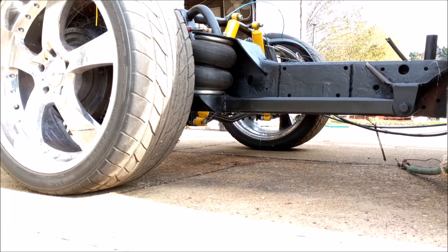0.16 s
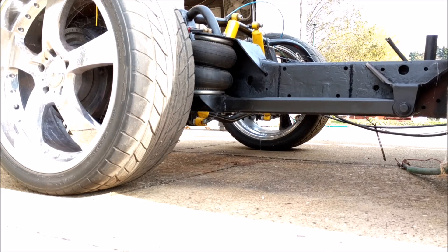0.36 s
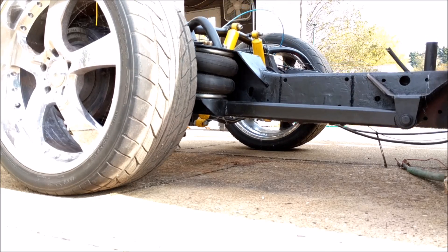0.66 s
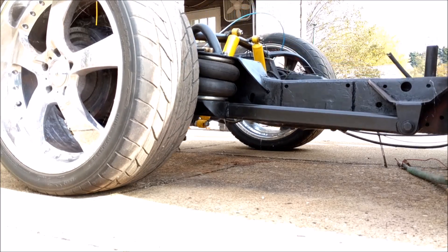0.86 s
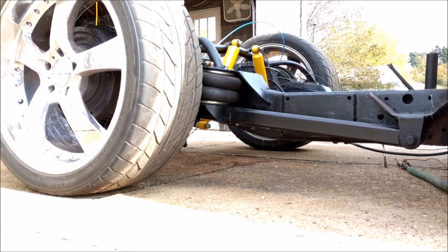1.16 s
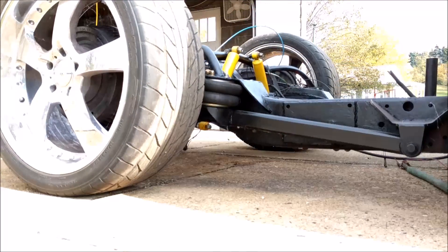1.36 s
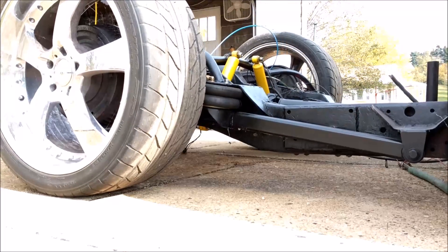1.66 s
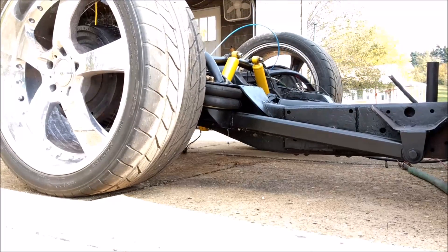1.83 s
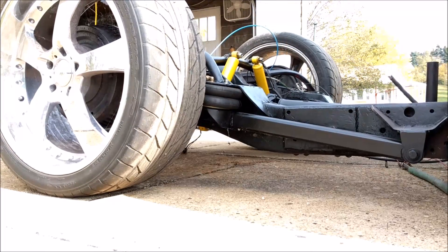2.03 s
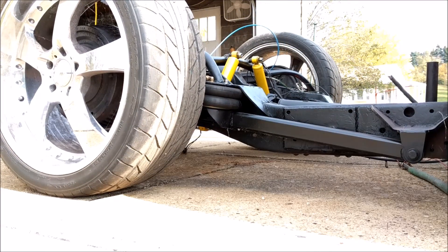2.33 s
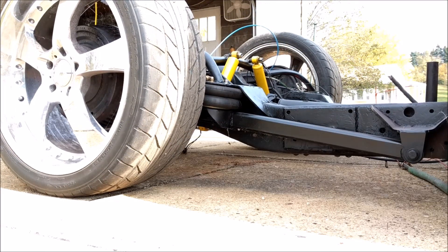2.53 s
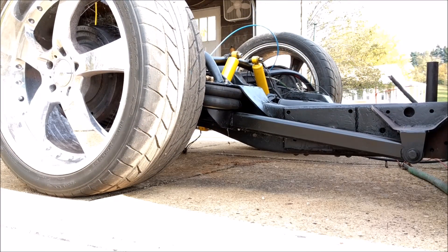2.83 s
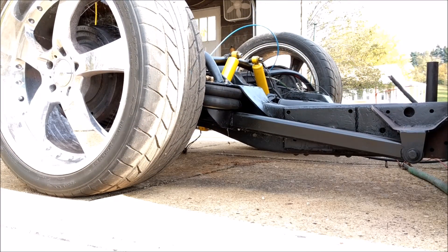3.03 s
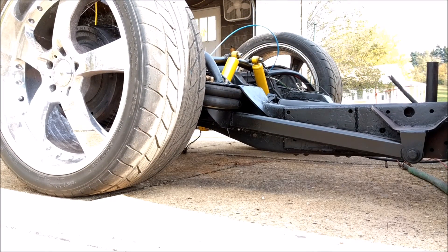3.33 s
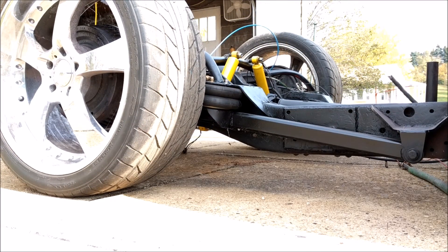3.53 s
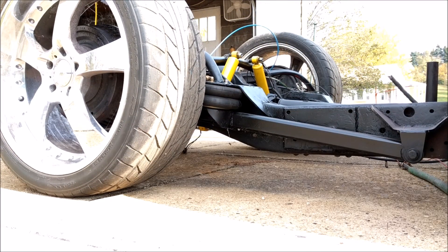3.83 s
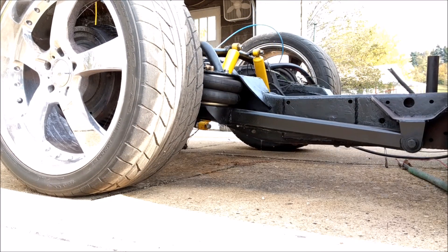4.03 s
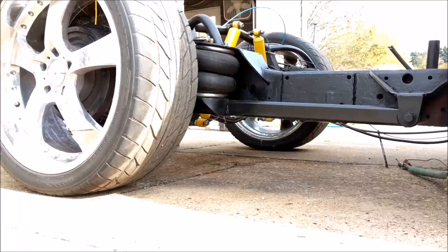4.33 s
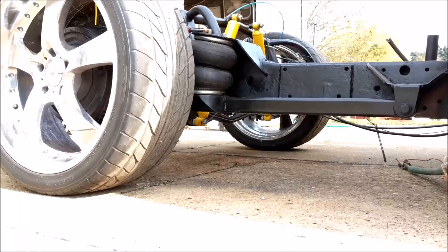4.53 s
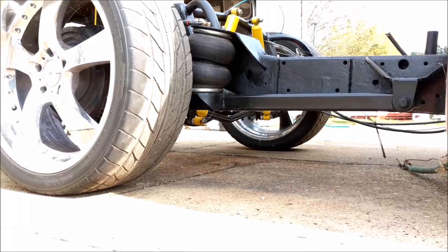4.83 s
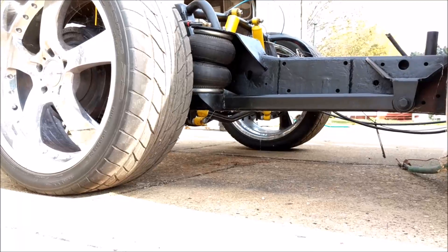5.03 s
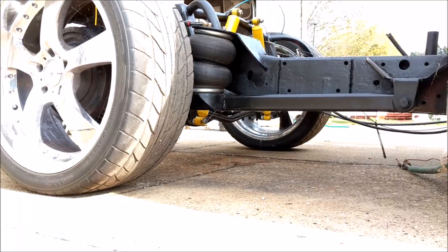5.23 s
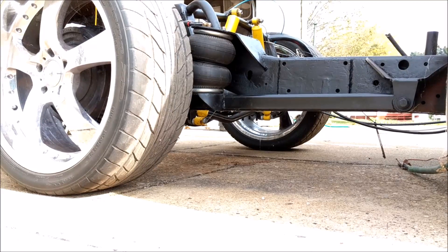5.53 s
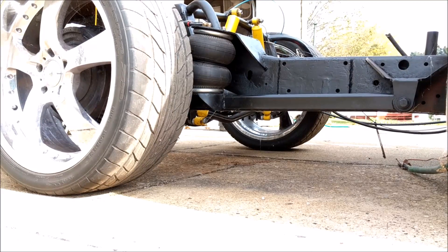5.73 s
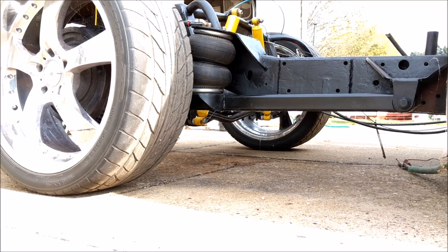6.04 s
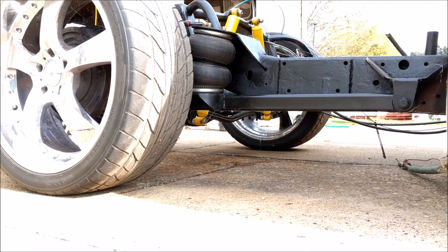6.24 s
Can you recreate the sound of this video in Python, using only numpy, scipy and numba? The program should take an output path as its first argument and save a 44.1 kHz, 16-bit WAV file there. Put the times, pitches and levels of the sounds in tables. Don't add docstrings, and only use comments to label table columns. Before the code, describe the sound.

On a concrete drive, a truck's air bags empty with an abrupt, harsh rush of air whose colour shifts as the frame sinks and bumps onto its stops. Steel rattles and hums briefly, and faint road drone returns. Then a very short violent blast, followed by a thinner whistling hiss that weakens before stopping. A few tiny ticks follow. Slightly coarse mono camera sound with short nearby reflections.

```python
import sys
import numpy as np
from scipy import signal
from scipy.fft import rfft, irfft, next_fast_len
from scipy.io import wavfile
from scipy.ndimage import uniform_filter1d
from numba import njit

SR = 44100
rng = np.random.default_rng(int(sys.argv[2]) if len(sys.argv) > 2 else 0)


def level_to_linear(level):
    exponent = np.asarray(level, float) / 20
    return 10 ** exponent


def transcribe(u):
    v = np.clip(np.atleast_2d(u).T, -1, 1)
    q = np.round(v * 32767).astype(np.int16)
    wavfile.write(sys.argv[1], SR, q)


N = 281799
TIME = np.arange(N) / SR


def unit(x):
    return x / np.sqrt(np.mean(x ** 2))


def walk(rate, size):
    hold = int(SR / rate)
    targets = rng.standard_normal(N // hold + 1)
    return unit(uniform_filter1d(np.repeat(targets, hold)[:size], hold))


@njit
def resonance(x, hz, width):
    y, band, low = np.empty(len(x)), 0., 0.
    for i in range(len(x)):
        g, k = np.tan(np.pi * hz[i] / SR), width / hz[i]
        v = (band + g * (x[i] - low)) / (1 + g * (g + k))
        band, low, y[i] = 2 * v - band, low + 2 * g * v, k * v
    return y


def air(spectrum, edges_hz, band_db, flicker_db, rate, size):
    fast = next_fast_len(size)
    octave = np.log2(np.arange(1, fast // 2 + 2) * SR / fast)
    hz, db = np.transpose(spectrum)
    noise = rfft(rng.standard_normal(fast)) * level_to_linear(np.interp(octave, np.log2(hz), db))
    centres = np.arange(np.floor(np.log2(hz[0])), np.log2(SR / 2) + .5, .5)
    zones = np.searchsorted(np.log2(edges_hz), centres)
    flicker = np.broadcast_to(flicker_db, 3)
    total = [np.zeros(size) for _ in range(3)]
    for centre, zone in zip(centres, zones):
        part = irfft(noise * np.clip(1 - 2 * abs(octave - centre), 0, 1), fast)[:size]
        total[zone] += part * level_to_linear(flicker[zone] * walk(rate, size))
    return sum(level_to_linear(db) * unit(x) for db, x in zip(band_db, total))


def valve(t, stroke, tail_db_s, lead_db):
    opens, shuts, closing, lost_db, linger = stroke
    lift_s, lead_db_s = .0013, 5000
    db = np.interp(t, [opens - lift_s, opens, shuts, shuts + closing], [lead_db, 0, 0, lost_db])
    lead_in = lead_db_s * np.minimum(t - opens + lift_s, 0)
    return db + lead_in + tail_db_s * np.maximum(t - shuts - closing - linger, 0)


def peak(t, s, db, rise_db_s, fall_db_s, round_s):
    return db - np.where(t < s, rise_db_s, fall_db_s) * (np.hypot(t - s, round_s) - round_s)


def place(x, t):
    start = round(t[0] * SR)
    return np.pad(x, (start, N - start - len(x)))


def late(x, ms):
    return np.roll(x, int(ms * SR / 1000))


# (pitch [Hz], level [dB per Hz])
TALL_BAG_AIR = [(150, -51), (250, -21.5), (298, -32), (336, -23.5), (538, -16.5), (1310, -17.5),
                (1610, -12), (4050, -0.5), (4900, -7), (6000, -5), (7310, -11.5), (9170, -6.5),
                (11300, -15), (14700, -5), (16000, -19)]
# (pitch [Hz], level [dB per Hz])
FLAT_BAG_AIR = [(150, -56.5), (250, -25.5), (436, -15), (723, -16), (1180, -10), (1310, -15), (1700, -6.5),
                (2160, -9.5), (2360, -2), (3650, -3), (4410, -3.5), (5630, -6), (7570, -12), (12500, -10),
                (15300, -6), (16000, -11)]
# (early pitch [Hz], late pitch [Hz], width [Hz], level [dB], time [s], length [s])
HOLLOWS = [(6250, 5500, 330, -7, 0.52, 0.28), (5650, 5600, 240, -10.5, 1.35, .55),
           (3900, 3900, 450, -8, .65, .25), (3690, 3450, 350, -7, 1.4, 0.23),
           (2470, 2350, 200, -7, .98, .28), (4230, 4200, 300, -9, 1.1, .2),
           (9200, 9300, 1000, -12, 1.2, .9), (3200, 3200, 350, -4, .41, .04),
           (8900, 8900, 900, -6, .4, .04), (13000, 13100, 700, -13, 1.2, .4),
           (1750, 1850, 250, -15, 1.0, .4)]
# (level [dB], change [dB/s], first surge [dB], tail [dB/s])
JET_ZONES = [(-24.5, 0.3, 5, -100), (-17.5, -.2, 9.5, -125), (-16, -5.5, 11, -200)]


def dump():
    t = TIME[SR // 4:2 * SR]
    stroke = (.394, 1.668, .018, -14, .04)
    surge_s, sinks_s, sinking_s = .026, .5, .9
    age = np.maximum(t - stroke[0], 0)
    sag = np.clip((t - sinks_s) / sinking_s, 0, 1)
    levels = []
    for db, change_db_s, surge_db, tail_db_s in JET_ZONES:
        surge = surge_db * np.exp(-age / surge_s)
        levels.append(db + change_db_s * age + surge + valve(t, stroke, tail_db_s, lead_db=-9))
    levels[1] = levels[1] + 3 * np.exp(-((t - .65) / .19) ** 2)
    jet = np.sqrt(1 - sag) * air(TALL_BAG_AIR, (2200, 6900), levels, 1.2, 14, len(t))
    jet += np.sqrt(sag) * air(FLAT_BAG_AIR, (2200, 6900), levels, 1.2, 14, len(t))
    for tall_hz, low_hz, width_hz, mode_db, s, length in HOLLOWS:
        hz = (tall_hz + (low_hz - tall_hz) * sag) * (1 + .018 * walk(6, len(t)))
        swell = np.exp(-((t - s) / length) ** 2)
        swell = swell * level_to_linear(levels[1] + mode_db + 1.5 + 1.5 * walk(8, len(t)))
        jet += swell * unit(resonance(rng.standard_normal(len(t)), hz, 1. * width_hz))
    return place(jet, t)


# (pitch [Hz], level [dB per Hz])
BLAST_AIR = [(88, -47.5), (150, -12), (235, -13), (391, -6), (1080, -20), (1630, -19), (2650, -11.5),
             (2870, -1.5), (3620, -8), (4000, -9), (4670, -9), (14500, -7.5), (16000, -12)]
# (pitch [Hz], level [dB per Hz])
HOSE_AIR = [(240, -45), (400, -21.5), (1090, -16.5), (1420, -12), (2180, -11.5), (2670, -10.5), (3120, -4),
            (3870, -8.5), (4440, -7), (11500, -16), (16000, -27)]
# (level [dB], change [dB/s], tail [dB/s])
HISS_ZONES = [(-40, -9, -110), (-23.5, -15, -300), (-26.5, -17, -360)]
# (pitch [Hz], width [Hz], level [dB], row of SONG_PEAKS that drives it)
HOSE_NOTES = [(1440, 110, 0, 0), (1900, 150, -2.5, 0), (2234, 120, 0, 1), (3222, 180, 0.5, 2),
              (4420, 250, 0, 3), (5510, 280, 0, 3), (6300, 250, -3, 3), (7500, 300, -7.5, 3),
              (9370, 560, -5.5, 3)]
# (time [s], level [dB], rise [dB/s], fall [dB/s], tail [dB/s])
SONG_PEAKS = [(4.14, -39.5, 80, 7, -80), (4.45, -23.5, 70, 50, -130), (4.29, -23.5, 85, 45, -350),
              (4.14, -32, 60, 22, -300)]


def fill():
    t = TIME[15 * SR // 4:21 * SR // 4]
    lead_db = -30
    blast = (3.9562, 3.984, .012, -11.5, .001)
    opens, *closing = (4.03, 4.835, .02, -4, .001)
    flow = (blast[1], *closing)
    blast_db = -1.5 - 90 * np.clip(t - blast[0], 0, blast[1] - blast[0])
    blast_db = blast_db + valve(t, blast, -400, lead_db)
    out = level_to_linear(blast_db) * air(BLAST_AIR, (900, 6900), (-21, -3, -4), 1.5, 90, len(t))

    age = np.maximum(t - blast[1], 0)
    swell_db = 20 * np.log10(np.clip(age / (opens - blast[1]), 1e-3, 1))
    levels = [db + change_db_s * age + swell_db + valve(t, flow, tail_db_s, lead_db)
              for db, change_db_s, tail_db_s in HISS_ZONES]
    out += air(HOSE_AIR, (1900, 6900), levels, 1.5, 12, len(t))

    flat_start, tighten_s, droop_per_s = .17, .1, .085
    bend_hz = 2300
    ratio = 1 + .012 - flat_start * np.exp(-(age / tighten_s / 2) ** 2)
    droop = 1 - droop_per_s * age ** 3
    for hz, width_hz, note_db, row in HOSE_NOTES:
        *top, tail_db_s = SONG_PEAKS[int(row)]
        bend = ratio ** (bend_hz / hz) * droop ** min(hz / bend_hz, 1)
        pitch = hz * bend * (1 + .012 * walk(15, len(t)))
        tone = resonance(rng.standard_normal(len(t)), pitch, 2.2 * width_hz)
        tone = resonance(tone, pitch, 1.2 * width_hz)
        db = note_db + peak(t, *top, round_s=.08) + valve(t, flow, tail_db_s, lead_db)
        out += unit(tone) * level_to_linear(db + 2.0 * walk(12, len(t)))
    return place(out, t)


# (time [s], level [dB], pitch [Hz], length [ms])
PUFFS = [
    (3.9595, -6, 425, 2.8),
    (3.972, -18, 55, 9),
    (1.632, -15, 420, 7),
    (4.035, -32, 340, 6),
    (4.062, -31, 450, 5),
    (4.088, -31, 330, 7),
    (4.095, -29, 75, 18),
    (4.87, -33, 190, 14),
]


def puffs():
    out = np.zeros(N)
    for s, db, hz, ms in PUFFS:
        swell = np.exp(-((TIME - s) * 1000 / ms) ** 2)
        out += level_to_linear(db) * swell * np.sin(2 * np.pi * hz * (TIME - s))
    return out


# (delay [ms], level [dB])
ECHOES = [(2.9, -22), (5.3, -19), (8.7, -17), (13.1, -17), (19.7, -17), (27.3, -18), (38.9, -19.5)]


def echoes(jets):
    return sum(level_to_linear(db) * late(jets, ms) for ms, db in ECHOES)


# (time [s], level [dB], own note [Hz], note over the rails [dB], note dies 60 dB in [s])
KNOCKS = [(0.393, -10.5, 262, 15.5, 0.046), (1.617, -8.5, 828, 13, 0.056), (1.624, -4, 748, 12.5, 0.082),
          (1.633, -18, 412, 19, 0.055), (1.641, -8.5, 280, 10, 0.056), (1.652, -3.5, 195, 12.5, 0.063),
          (1.666, -9, 319, 15, 0.069), (1.681, -10, 252, 16, 0.05), (1.705, -14, 182, 15, 0.045),
          (1.732, -21.5, 174, 12, 0.05), (1.78, -17, 199, 12, 0.043), (1.84, -16.5, 75, 13.5, 0.064)]
# (pitch [Hz], level [dB], dies 60 dB in [s])
RAILS = [(129, -8, 0.44), (199, -6, 0.38), (264, -5, 0.57), (335, -9, 0.8), (375.5, -5.5, 0.37),
         (528, -20, 0.96), (748, -22.5, 1.8), (877, -4.5, 0.11), (1087, -8.5, 0.23), (1416, -15.5, 0.38)]


def frame():
    out, t = np.zeros(N), TIME[:SR // 2]
    for s, db, note_hz, note_db, note_t60 in KNOCKS:
        modes = [(hz, mode_db + 3 * rng.standard_normal(), .8 * t60) for hz, mode_db, t60 in RAILS]
        modes.append((note_hz, note_db, max(note_t60, .01)))
        ring = np.zeros(len(t))
        for hz, mode_db, t60 in modes:
            ring += level_to_linear(mode_db) * np.exp(-np.log(1000) * t / t60) * np.sin(2 * np.pi * hz * t)
        push = np.hanning(int(.6 * SR / note_hz) + 3)
        knock = np.convolve(ring, push / push.sum())[:len(t)]
        start = int(s * SR)
        out[start:start + len(t)] += level_to_linear(db - 17.5) * knock

    t = TIME[3 * SR // 2:9 * SR // 4]
    low = peak(t, 1.67, -25, 300, 36, .01)
    clang = peak(t, 1.628, -23, 1500, 90, .005)
    steel = [(60, -18), (130, 6), (350, -1.5), (800, -6.5), (1500, -22), (3000, -50)]  # (Hz, dB per Hz)
    shudder = air(steel, (380, 1300), (low, clang, clang - 15), 1.0, 30, len(t))
    fade = np.clip((t[-1] - t) / .1, 0, 1)

    hum_s, hum_db, hum_hz, hum_t60 = 1.7, -27.5, 199, 2.0
    age = np.maximum(TIME - hum_s, 0)
    swell = (1 - np.exp(-age / .02)) * np.exp(-np.log(1000) * age / hum_t60)
    hum = level_to_linear(hum_db) * swell * np.sin(2 * np.pi * hum_hz * age)
    return out + hum + place(shudder * fade, t)


# (time [s], level [dB], pitch [Hz])
TICKS = [
    (2.2131, -37.5, 12300),
    (2.5421, -34.5, 13100),
    (3.493, -38.5, 12500),
    (5.5547, -31.5, 11800),
    (6.0526, -35.5, 13500),
]


def ticks():
    out, t = np.zeros(N), np.arange(120) / SR
    for s, db, hz in TICKS:
        grain = np.diff(rng.standard_normal(len(t)), prepend=0)
        snap = (np.sin(2 * np.pi * hz * t) + .5 * grain) * np.exp(-t / .00025)
        start = int(s * SR)
        out[start:start + len(t)] += level_to_linear(db) * snap
    return out


# (pitch [Hz], level [dB per Hz])
ROAD_AIR = [(12, -51.5), (25, -33), (52, -6.5), (81, 0), (150, -5.5), (241, -8.5), (277, -11), (347, -13),
            (472, -15.5), (558, -20.5), (923, -25.5), (1610, -29.5), (7110, -49), (14700, -51.5),
            (16000, -53)]
# (time [s], level [dB])
PASSING = [
    (0, 1.5),
    (.4, 2.5),
    (1.95, 1.5),
    (2.6, 5),
    (3.4, 0),
    (3.95, 1.5),
    (4.6, -1.5),
    (5.3, -6),
    (6.39, -6),
]


def traffic():
    near = np.interp(TIME, *np.transpose(PASSING))
    rumble_db, roar_db, hiss_db = -35.5 + .5 * near, -42.5 + near, -49
    road = air(ROAD_AIR, (200, 800), (rumble_db - 3, roar_db, hiss_db), (1.5, 1.2, .5), 4, N)
    hz = 80 * (1 + .06 * walk(1.5, N))
    engines = resonance(resonance(rng.standard_normal(N), hz, 40.), hz, 40.)
    return road + level_to_linear(rumble_db - 3.5) * unit(engines)


def gain_control(loud):
    from_db, slope, max_db, recover_db_s = -27, .8, 10, 75
    db = 10 * np.log10(uniform_filter1d(loud ** 2, SR // 40) + 1e-9)
    recovery = recover_db_s * TIME
    duck = np.clip(slope * (db - from_db), 0, max_db) + recovery
    return level_to_linear(recovery - np.maximum.accumulate(duck))


def scene():
    jets = dump() + fill()
    jets = jets + echoes(jets)
    background = gain_control(late(jets, 12.)) * traffic()
    return np.tile(jets + puffs() + frame() + ticks() + background, (2, 1))


# (time [s], extra coarseness [dB])
STARVED = [(1.5016, 13), (1.587, 14), (1.7371, 12.5), (1.8638, 11), (1.9067, 12), (2.8026, 13),
           (2.8884, 12), (3.08, 13), (3.1858, 12), (3.2716, 12), (3.3783, 12), (3.4861, 13), (3.6776, 13),
           (4.085, 13.5), (4.1486, 11), (4.7233, 10), (5.1493, 12), (5.6611, 12), (6.3855, 11)]


def camera_rounding(x):
    hop, first = 941, 330
    step_db, masking, scatter_db, holes = -1.0, .45, 2.5, 2.3
    count = N // hop + 3
    pad = np.pad(x, (2 * hop - first, 3 * hop))
    n = np.arange(2 * hop) + .5
    waves = np.cos(np.pi / hop * np.outer(np.arange(hop) + .5, n + hop / 2))
    basis = np.sin(np.pi * n / (2 * hop)) * waves
    lines = pad[hop * np.arange(count)[:, None] + np.arange(2 * hop)] @ basis.T
    edges = np.unique(np.cumsum(np.minimum(4 * 1.11 ** np.arange(44), 32)).astype(int) - 4)
    edges = edges[edges < hop]
    widths = np.diff(np.append(edges, hop))
    band_db = 10 * np.log10(np.add.reduceat(lines ** 2, edges, axis=1) / widths + 1e-12)
    chance = rng.standard_normal((2, *band_db.shape))
    coarse = step_db + 20 * (chance[0] > holes) * (edges > hop // 2) + 0 * band_db
    for s, db in STARVED:
        k = round((s * SR - first) / hop) + 1
        weakness = np.median(band_db[k, :-4]) - band_db[k]
        coarse[k] += db + masking * weakness + scatter_db * chance[1, k]
    loud = band_db[:, 20:].mean(axis=1)
    coarse[1:][np.diff(loud) > 9] = -30
    step = np.repeat(level_to_linear(band_db + coarse), widths, axis=1)
    lines[:, int(15960 * 2 * hop / SR):] = 0
    rounded = np.sign(lines) * np.floor(abs(lines) / step + .4) * step
    frames = rounded @ basis * 2 / hop
    out = np.zeros((count + 1, hop))
    out[:-1] += frames[:, :hop]
    out[1:] += frames[:, hop:]
    return out.ravel()[2 * hop - first:][:N]


def low_pass(x):
    return signal.sosfilt(signal.butter(12, 16340, fs=SR, output="sos"), x)


def record(dry):
    mono = camera_rounding(np.clip(dry[0], -1, 1))
    mix = np.tile(mono, (2, 1))
    return low_pass(mix)


dry = scene()
out = record(dry)
transcribe(out)
```